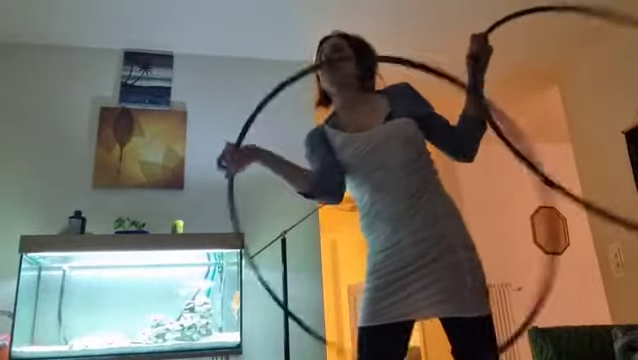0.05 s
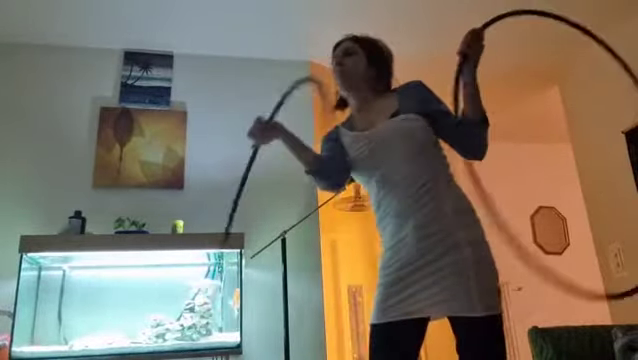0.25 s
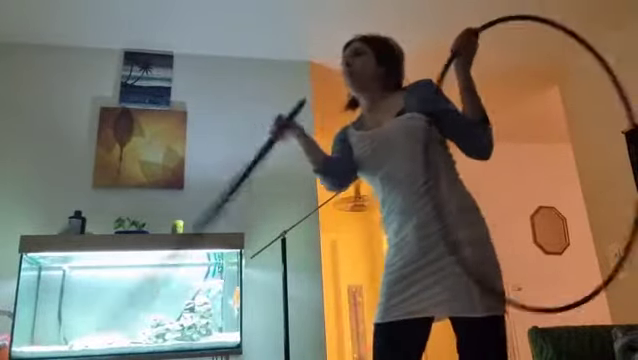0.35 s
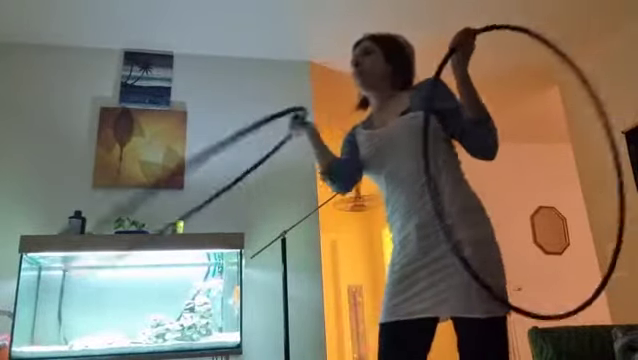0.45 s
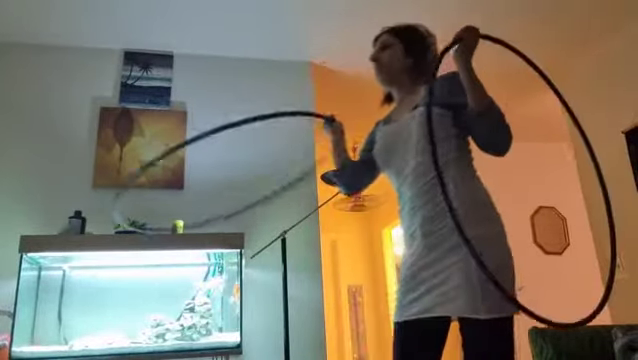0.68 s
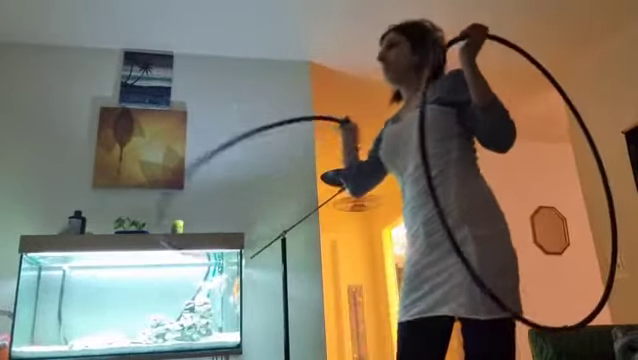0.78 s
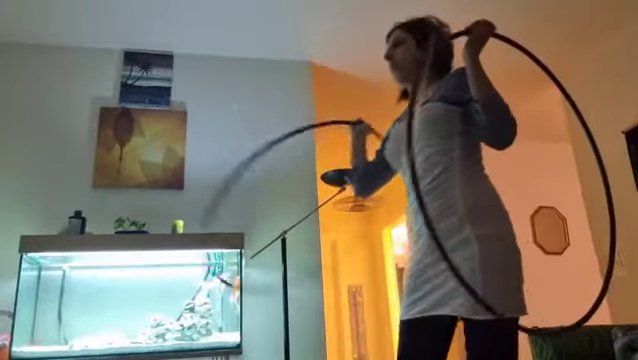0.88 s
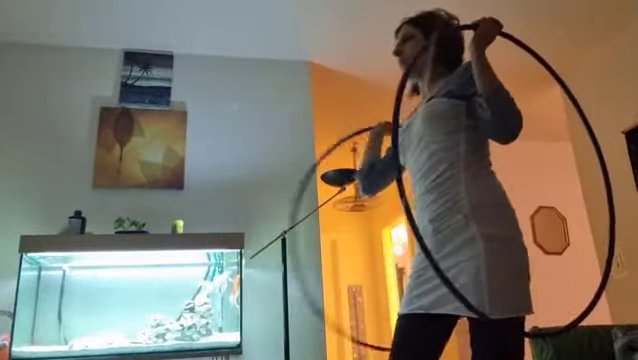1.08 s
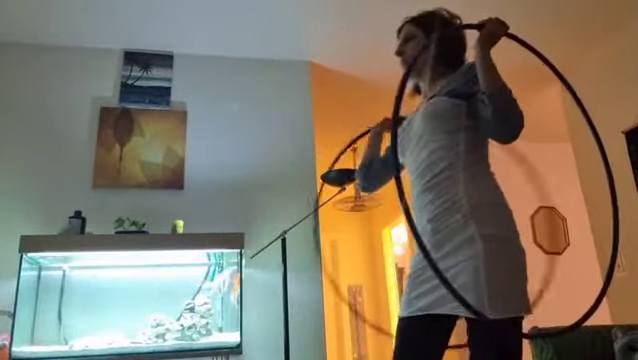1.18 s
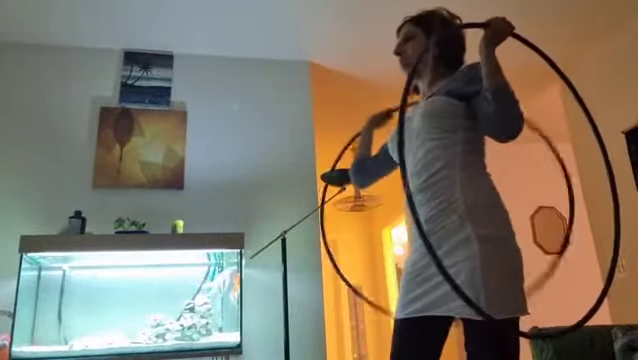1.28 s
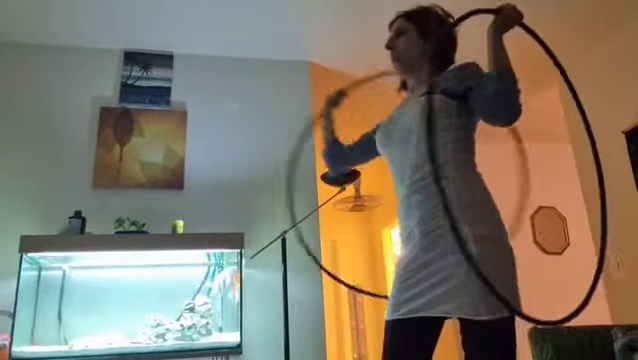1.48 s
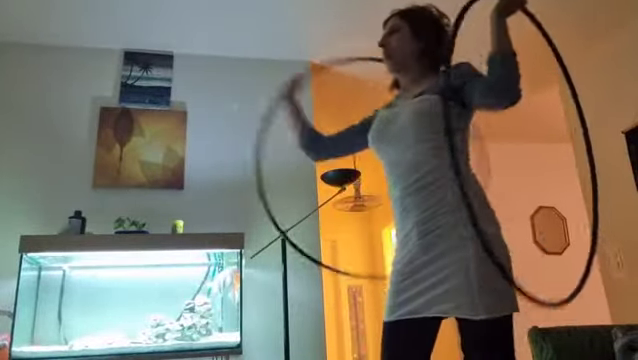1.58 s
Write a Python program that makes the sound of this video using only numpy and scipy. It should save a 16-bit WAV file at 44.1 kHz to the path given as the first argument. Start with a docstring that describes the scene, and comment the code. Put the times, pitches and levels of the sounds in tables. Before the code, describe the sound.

Two plastic hoops knock together once with a sharp clack and a brief ring in a small room. Faint swishes follow as a hoop slides in the hand, over the low hum of an aquarium pump.

```python
"""Plastic hoops in a small room

Two plastic hoops knock together once in a small living room: the impact excites the tubes' modes
(a hard clack, a short ring) and the walls return a flurry of echoes. Later a hoop slides round in
the hand with a soft swish of friction. An aquarium pump hums under the quiet room air."""
import sys
import numpy as np
from scipy import signal
from scipy.fft import rfft, irfft
from scipy.io import wavfile
from scipy.ndimage import uniform_filter1d

SR = 44100
rng = np.random.default_rng(int(sys.argv[2]) if len(sys.argv) > 2 else 0)


def unload_wav(signal):
    """Save mono or channel-first audio to the path in sys.argv[1] as 16-bit WAV at rate SR, clipped to [-1, 1]."""
    wavfile.write(
        sys.argv[1],
        SR,
        np.round(np.clip(np.atleast_2d(signal).T, -1, 1) * 32767).astype(np.int16),
    )


N = 72765

# spectrum of the contact click: frequency_hz, level_db
CLICK_SPECTRUM = [(100, -19), (300, -13), (650, -24), (1200, -20), (4000, -18), (9200, -13), (15500, -12)]
# heavily damped modes of the tube wall: pitch_hz, level_db, t60_s
TUBE_MODES = [(1150, -39, .028), (1500, -40, .018), (2600, -28, .007), (3900, -33, .007), (4950, -20, .005),
              (5650, -13.5, .0052), (6200, -29, .012), (7450, -13.5, .005), (8400, -32, .005)]
def clack(t):
    """Impact excitation: a brief contact radiates a click and sets the tube wall vibrating."""
    contact_s = .00013
    modes = sum(undb(db) * np.sin(2 * np.pi * hz * t) * fade(t, t60) for hz, db, t60 in TUBE_MODES)
    return click(CLICK_SPECTRUM) + modes * (1 - np.exp(-t / contact_s))


# lightly damped modes of the hollow hoop: pitch_hz, relative_level_db, t60_s
HOOP_MODES = [(1236, -54.5, .25), (2120, -62.5, .45), (2318, -56, .45), (2900, -52.5, .35),
              (3231, -56.5, .3), (3984, -58, .35), (4234, -53.5, .3), (4893, -49, 0.22), (5122, -52.5, .3),
              (5560, -52, .3), (5784, -51.5, 0.2), (6200, -42, .15), (7659, -45, .18)]
def hoop_ring(t):
    """Free vibration: each mode decays exponentially, with a random phase on each side."""
    gain_db = 5.5
    phases = rng.random((len(HOOP_MODES), 2, 1))
    return sum(undb(db + gain_db) * np.sin(2 * np.pi * (hz * t + phase)) * fade(t, t60)
               for (hz, db, t60), phase in zip(HOOP_MODES, phases))


# first echoes from ceiling and walls: delay_s, level_db, left_minus_right_db
REFLECTIONS = [(.0022, -13, 2), (.0073, -8, 4), (.0103, -12, 2), (.0131, -8, 0), (.0152, -11, 4),
               (.0167, -12, 4)]
def early_reflections(t, source):
    """Reflection and scattering: each surface returns a delayed copy, smeared by the furniture."""
    smear_s = .0012
    out = 0
    for delay_s, db, pan_db in REFLECTIONS:
        smear = rng.standard_normal((2, N)) * np.exp(-t / smear_s)
        smear /= np.linalg.norm(smear, axis=1, keepdims=True)
        echo = irfft(rfft(source) * rfft(smear), N)
        out += undb([[db + pan_db / 2], [db - pan_db / 2]]) * delay(echo, delay_s)
    return out


# diffuse sound of the knock: frequency_hz, relative_level_db
REVERB_SPECTRUM = [(100, -13.5), (260, -4.5), (480, -3.5), (720, -11), (1200, 3.5), (1450, 1.5), (1800, -5),
                   (2300, 2.5), (2800, 2), (3500, -2), (4200, 4.5), (5300, 5.5), (6600, 2), (7900, 6),
                   (9100, -1), (12500, 0), (15500, -10)]
# reverberation time by band: frequency_hz, t60_s
REVERB_TIMES = [(200, 0.94), (1100, .3), (2400, 0.44), (5000, 0.41), (8000, 0.32), (14000, 0.22)]
def reverberation(t):
    """Diffuse field: dense early scatter, then a tail that dies fastest in the high treble."""
    tail_db, scatter_db, build_s = -34.5, -31, .004
    colour = undb(along(REVERB_SPECTRUM, bins()))
    wash = rfft(noise(colour))
    log_centres = np.log([hz for hz, _ in REVERB_TIMES])
    tail = 0
    for share, (_, t60) in zip(np.eye(len(log_centres)), REVERB_TIMES):
        band = np.interp(np.log(bins() + 1), log_centres, share)
        tail += irfft(wash * band, N) * fade(t, t60)
    scatter = noise(colour) * fade(t, t60=.13)
    return (undb(tail_db) * tail + undb(scatter_db) * scatter) * (1 - np.exp(-t / build_s))


def knock(t):
    """Superposition: the direct clack, a little later on the left, adds to the room sound and ring."""
    left_lag_s = .000033
    source = clack(t)
    direct = np.array([delay(source, left_lag_s), source])
    return direct + reverberation(t) + early_reflections(t, source) + hoop_ring(t)


# slides of the hoop in the hand: start_s, attack_s, hold_s, release_s, level_db, tilt_db_per_octave
SLIDE_STROKES = [(0.391, 0.027, 0.045, 0.15, -69.5, -1), (0.591, 0.0335, 0.0083, 0.062, -76.5, 12),
                 (0.895, 0.03, 0.018, .04, -76, -9), (1.218, .12, 0.14, 0.096, -69, -2),
                 (1.467, 0.066, 0.061, 0.16, -66, -2)]
# friction noise: frequency_hz, relative_level_db
FRICTION_SPECTRUM = [(300, -1), (1000, -3.5), (2300, -6.5), (3600, -4), (5100, 3), (6000, -2), (6700, -6),
                     (7800, -5.5), (9500, -16), (15000, -29)]
def slides(t):
    """Sliding friction: the hand rubs the tube unevenly, making broadband noise that flickers."""
    roughness_db = 1
    octaves = np.log2(np.clip(bins(), 1000, 8000))
    out = 0
    for start, attack, hold, release, db, tilt_db in SLIDE_STROKES:
        envelope = np.interp(t, start + np.cumsum([0, attack, hold, release]), [0, 1, 1, 0])
        rub = noise(undb(along(FRICTION_SPECTRUM, bins()) + tilt_db * octaves))
        out += rub * envelope * undb(db + roughness_db * walk(rate=120))
    return out


# faint squeaks of the rubbed tube: midpoint_s, length_s, pitch_hz, bandwidth_hz, level_db
SQUEAK_BANDS = [(1.406, 0.22, 4945, 89, -72.5), (1.42, 0.15, 5960, 120, -81),
                (1.446, 0.16, 5300, 500, -76.5), (1.612, 0.033, 4664, 110, -68.5)]
def squeaks(t):
    """Resonance: friction briefly excites narrow bands of the tube's response."""
    out = 0
    for midpoint, length, pitch, bandwidth, db in SQUEAK_BANDS:
        envelope = np.exp(-(2 * (t - midpoint) / length) ** 4)
        resonance = 1 / (1 + (2 * (bins() - pitch) / bandwidth) ** 2)
        out += noise(resonance) * undb(db) * envelope
    return out


# hum and buzz of the pump: pitch_hz, rms_level_db
PUMP_PARTIALS = [(49.9, -59), (99.8, -68), (149.7, -73), (299.5, -80), (345, -77.5), (392, -82.5)]
def pump_hum(t, side_cycles):
    """Periodic vibration: the pump radiates steady partials, offset in phase between the sides."""
    return np.sqrt(2) * sum(undb(db) * np.sin(2 * np.pi * (hz * t + rng.random() + side_cycles))
                            for hz, db in PUMP_PARTIALS)


# envelope of a low drone: time_s, rms_level_db
DRONE_LEVELS = [(0, -57), (.3, -60.5), (.6, -56), (.8, -56), (1.0, -60), (1.13, -69), (1.21, -74.5),
                (1.65, -66.5)]
def drone(t, side_cycles):
    """Amplitude modulation: one low tone swells and sinks."""
    pitch_hz = 71.8
    amplitude = np.sqrt(2) * undb(np.interp(t, *np.array(DRONE_LEVELS).T))
    return amplitude * np.sin(2 * np.pi * (pitch_hz * t + rng.random() + side_cycles))


# room air: frequency_hz, relative_level_db
AIR_SPECTRUM = [(170, -9), (240, -10), (325, -6), (450, -13), (540, -11), (660, -17), (900, -16),
                (1250, -16), (1700, -20), (2800, -21), (4200, -29), (6000, -36), (8000, -41), (10000, -45),
                (14900, -46), (15400, -32), (16000, -46)]
# low rumble: frequency_hz, relative_level_db
RUMBLE_SPECTRUM = [(20, -6.5), (60, 9), (120, 3), (200, -8.5), (300, -15.5)]
def room_air():
    """Stationary noise: a soft hiss lies over a low rumble."""
    air_db, rumble_db = -65.5, -71
    air = noise(undb(along(AIR_SPECTRUM, bins())) * (bins() > 170))
    rumble = noise(undb(along(RUMBLE_SPECTRUM, bins())) * (bins() < 300))
    return undb(air_db) * air + undb(rumble_db) * rumble


# likeness of left and right: frequency_hz, correlation
COHERENCE = [(100, 0.28), (300, .82), (600, .58), (1200, .3), (2300, 0.17), (5000, 0), (12000, 0.15)]
def noise(gain):
    """Partial coherence: stereo noise of rms 1, shaped per bin, most alike in the low midrange."""
    alike = along(COHERENCE, bins())
    mid, side = rfft(rng.standard_normal((2, N))) * np.sqrt([1 + alike, 1 - alike]) * gain
    return unit(irfft(np.array([mid + side, mid - side]), N))


def click(spectrum):
    """Minimum phase: folding the cepstrum gives a causal impulse with this spectrum."""
    cepstrum = irfft(np.log(undb(along(spectrum, bins()))), N)
    cepstrum[1:N // 2] *= 2
    cepstrum[N // 2:] = 0
    return irfft(np.exp(rfft(cepstrum)), N)


def delay(x, delay_s):
    """Linear phase shift: a delay exact to a fraction of a sample."""
    hz = np.arange(N + 1) * SR / (2 * N)
    return irfft(rfft(x, 2 * N) * np.exp(-2j * np.pi * hz * delay_s), 2 * N)[..., :N]


def fade(t, t60):
    """Exponential decay: 60 dB in t60 seconds."""
    return np.exp(-np.log(1000) * t / t60)


def walk(rate):
    """Moving average: random steps, rate per second, smoothed to a wander of rms 1."""
    hold = int(SR / rate)
    steps = np.repeat(rng.standard_normal(N // hold + 1), hold)
    return unit(uniform_filter1d(steps, hold)[:N])


def along(points, hz):
    """Interpolation of (frequency, value) points on a log-frequency axis."""
    frequencies, values = np.array(points).T
    return np.interp(np.log(np.maximum(hz, 1)), np.log(frequencies), values)


def bins():
    """Fourier bin frequencies in Hz."""
    return np.arange(N // 2 + 1) * SR / N


def undb(db):
    """Decibels to amplitude ratio."""
    return 10 ** (np.asarray(db) / 20)


def unit(x):
    """Normalisation to rms 1."""
    return x / np.sqrt(np.mean(x ** 2))


def scene():
    """Superposition: the knock and the rubbing add to the background."""
    t = np.arange(N) / SR
    knock_s = .2254
    side_cycles = np.array([[-.5], [.5]]) * .055  # phase offsets, left and right
    hoops = delay(knock(t), knock_s) + slides(t) + squeaks(t)
    return hoops + pump_hum(t, side_cycles) + drone(t, -side_cycles) + room_air()


def record(dry):
    """Band limiting: a steep low-pass filter removes the highest treble."""
    cutoff_hz = 15700
    return signal.sosfilt(signal.ellip(10, .1, 80, cutoff_hz, fs=SR, output="sos"), dry)


dry = scene()
out = record(dry)
unload_wav(out)
```